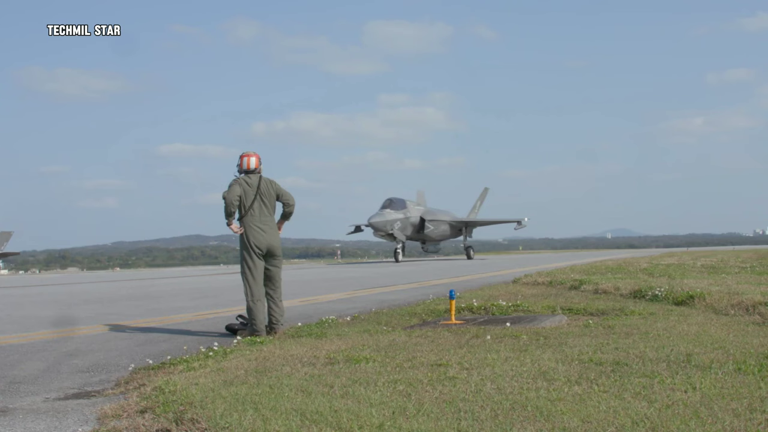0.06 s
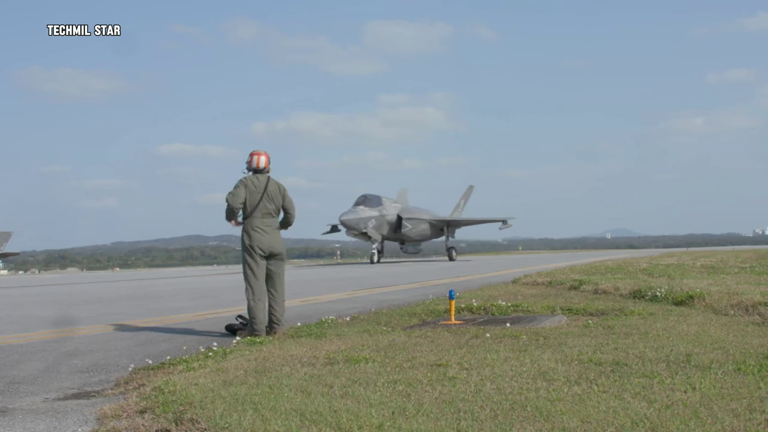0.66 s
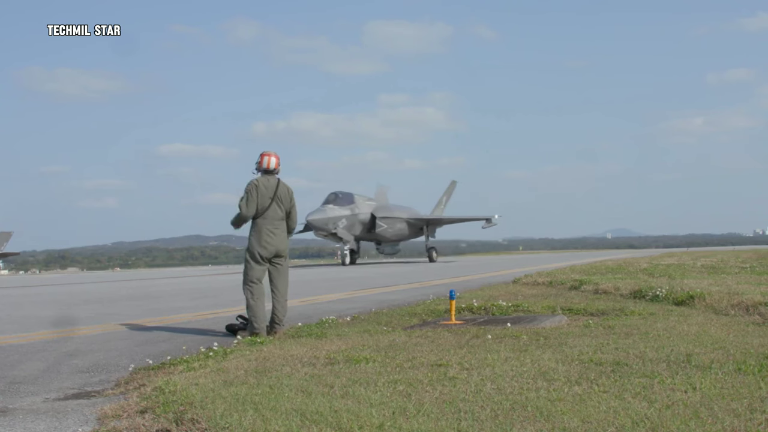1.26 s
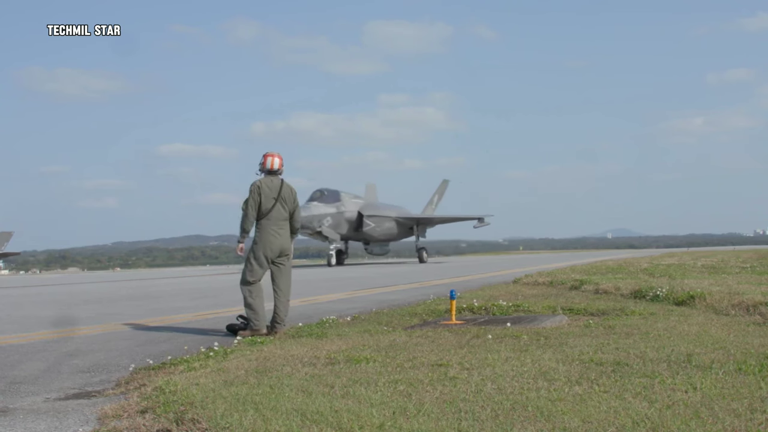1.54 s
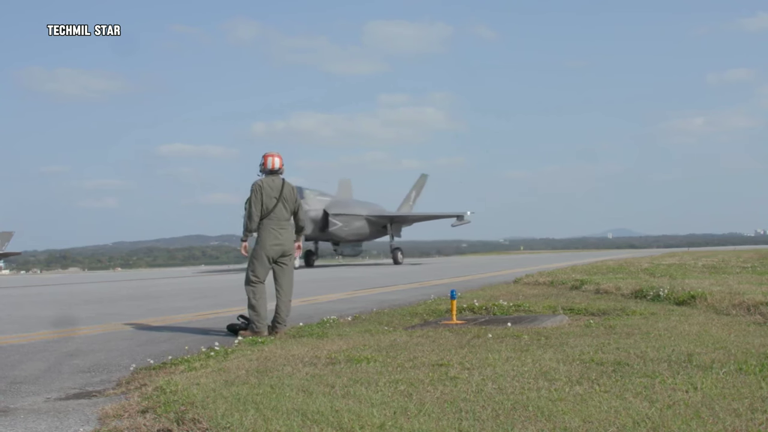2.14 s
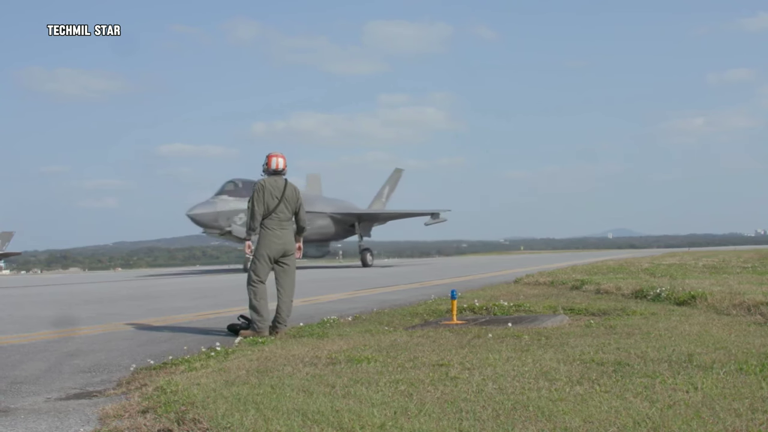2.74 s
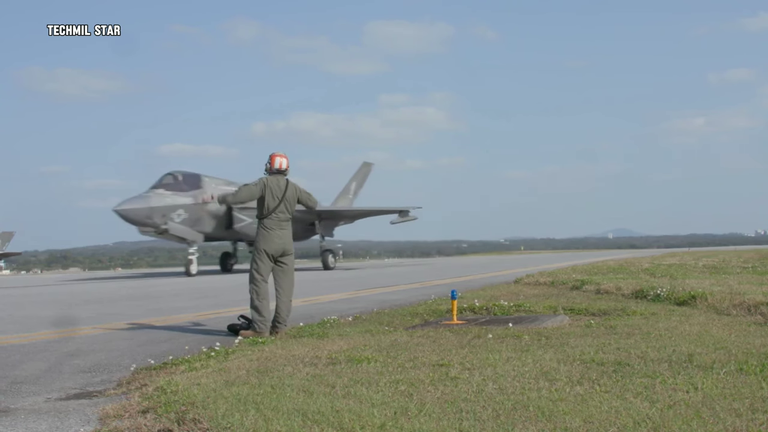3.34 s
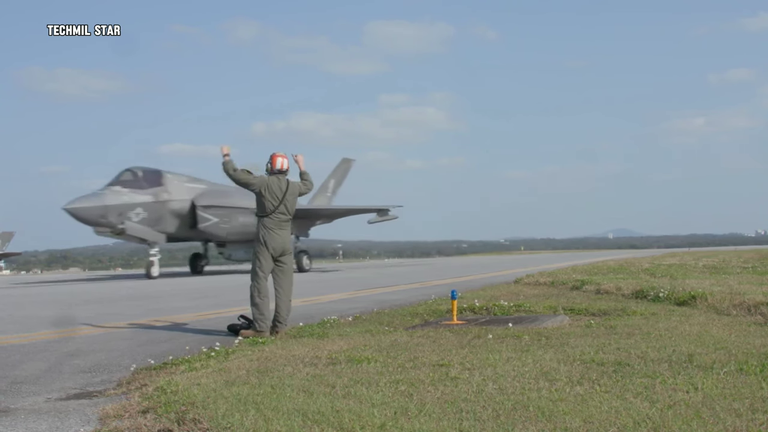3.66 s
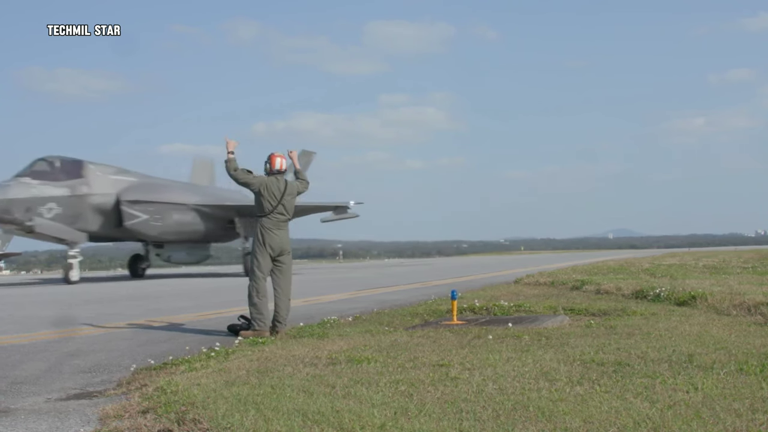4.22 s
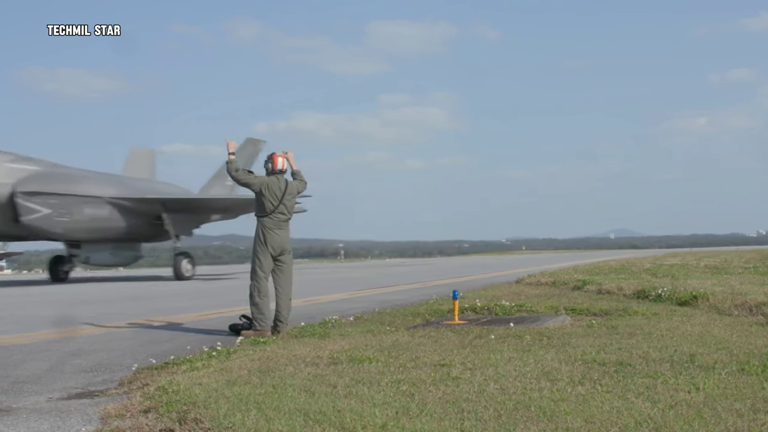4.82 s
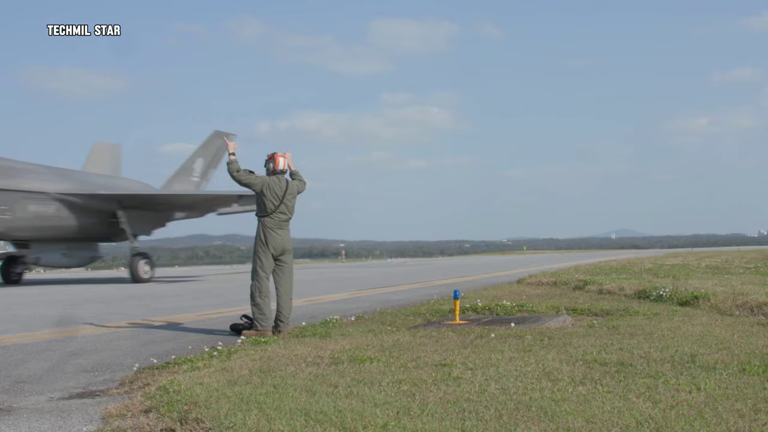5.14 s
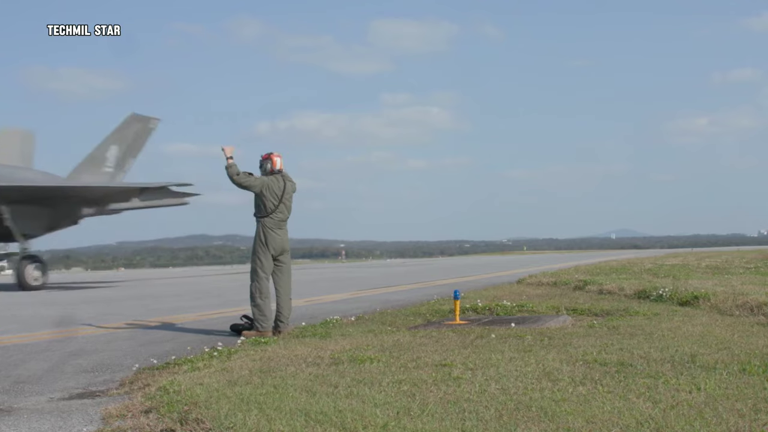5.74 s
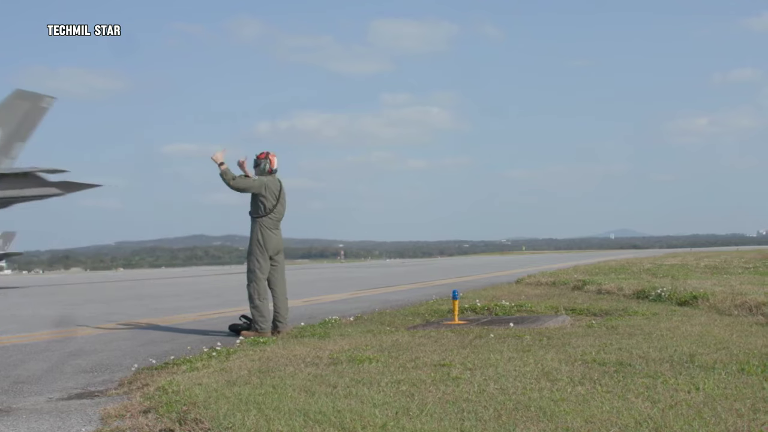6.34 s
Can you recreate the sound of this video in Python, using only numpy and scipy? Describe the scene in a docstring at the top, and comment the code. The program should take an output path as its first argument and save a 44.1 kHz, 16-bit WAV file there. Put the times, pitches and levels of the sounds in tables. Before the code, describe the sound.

A fighter jet taxis past with a steady rushing hiss and a high whine that rises briefly, then slowly sinks.

```python
"""Open airfield: a fighter jet taxis past, throttle nudged up and eased back. One microphone, mono.
A puff of wind buffets the microphone. The exhaust roars beneath and howls as the tail swings into view.
The intake's rush and hiss swell and fade through the breeze; the compressor whistles at low speed.
On top the fan whines, inside bands of blade noise that follow its speed.
The ground's reflection cuts two sliding dips in the jet's spectrum."""
import sys
import numpy as np
from scipy import signal
from scipy.fft import rfft, irfft, next_fast_len
from scipy.io import wavfile

SR = 44100
rng = np.random.default_rng(int(sys.argv[2]) if len(sys.argv) > 2 else 0)


def generate_wav(signal):
    """Clip the signal to [-1, 1] and save it as 16-bit WAV at the path in sys.argv[1]."""
    frames = np.transpose(np.atleast_2d(signal))
    scaled = np.clip(frames, -1, 1) * 32767
    pcm = np.round(scaled).astype(np.int16)
    wavfile.write(sys.argv[1], SR, pcm)


N = 281517

# noise spectra: f/Hz, relative density/dB
WIND_SPECTRUM = [(20, -10), (55, -2), (100, 8), (150, -7)]
RUMBLE_SPECTRUM = [(25, -29), (50, -27), (80, -19.5), (105, -11), (135, -8), (175, -4), (220, 1.5),
                   (255, -2.5), (290, -6), (360, -6.5)]
ROAR_SPECTRUM = [(250, -15.5), (310, -10), (370, -3.5), (470, 2), (600, -0.5), (700, 0), (800, 1),
                 (900, 2.5), (1100, -5)]
NOZZLE_SPECTRUM = [(4800, -23), (5300, -4), (5800, 3.5), (6500, -11), (7400, 1), (8100, -12), (9000, -24),
                   (11000, -32)]
RUSH_SPECTRUM = [(700, -37), (900, -2), (1130, -5), (1350, 1.5), (1900, 0), (2400, 0), (2900, -1),
                 (3500, -5.5), (4200, -1), (4900, -5.5), (5400, -6), (6500, -7.5), (8000, -29)]
HISS_SPECTRUM = [(5000, -20), (5600, -14.5), (6100, -3), (6400, 0), (6700, 2), (7000, -4), (7400, -12.5),
                 (7900, -24), (9000, -38)]
SPRAY_SPECTRUM = [(5000, -20), (7000, 6.5), (8100, 1), (8800, 7), (9600, 1), (10800, -0.5), (12000, -4),
                  (13200, -12.5), (15000, -17)]
# engine speed as fan pitch: t/s, f/Hz
FAN_PITCH = [(0, 1374), (.25, 1391), (.6, 1500), (1.05, 1680), (1.3, 1743), (2, 1704), (3, 1631), (4, 1563),
             (5, 1507), (5.5, 1487), (6.38, 1443)]
# swells of intake rush and hiss, shared by other engine sounds: t/s, level/dB
RUSH_SWELLS = [(0.0, -30.5), (0.18, -30.5), (0.6, -24.5), (0.92, -30.5), (1.56, -25.5), (2.04, -29),
               (2.98, -27.5), (3.24, -31), (3.44, -29.5), (3.66, -25.5), (6.1, -29), (6.38, -28)]
HISS_SWELLS = [(0.0, -32.5), (0.16, -31.5), (0.28, -33.5), (0.68, -23.5), (0.8, -30), (1.18, -29),
               (1.42, -22.5), (1.52, -29), (1.72, -24), (2.08, -30.5), (2.16, -25), (2.42, -30.5),
               (2.82, -25.5), (3.02, -32.5), (3.34, -27.8), (3.5, -30.5), (3.66, -25.5), (4.94, -29),
               (5.7, -29), (6.38, -35)]
# envelopes of compressor rasp, fan wash and fan tone: t/s, level/dB
RASP_ENVELOPE = [(0, -41), (.69, -23.5), (1, -34), (1.4, -29), (1.8, -39), (2.25, -30.5), (2.85, -27.5),
                 (3.15, -38), (3.35, -26), (3.75, -29.5), (5.3, -31), (6.38, -29)]
WASH_ENVELOPE = [(0, -33.5), (2, -34), (2.4, -27), (3.3, -31.5), (3.75, -40), (4.1, -31.5), (4.6, -38),
                 (5.6, -31), (6.38, -38.5)]
WHINE_ENVELOPE = [(0, -46), (0.16, -51), (0.34, -30), (0.66, -36), (0.84, -27.5), (1.15, -35.5),
                  (1.35, -32), (2.12, -35.5), (2.26, -26.5), (2.88, -30.5), (3.02, -42), (3.28, -32.5),
                  (3.66, -46), (3.88, -33.5), (4.34, -40.5), (4.56, -27), (5.08, -34.5), (5.26, -25.5),
                  (5.68, -27.5), (5.84, -35.5), (6.38, -31)]
# ground-reflection dips: t/s, centre f/Hz, share cancelled/0-1
LOW_DIP = [(0, 588, 1), (1.6, 604, 0.67), (4, 556, 0.04), (6.38, 600, 0.05)]
HIGH_DIP = [(0, 5800, 0.12), (2, 5580, 0.55), (3.7, 5500, .7), (4.4, 5262, .74), (5.2, 5060, 0.62),
            (6.38, 4850, 0.16)]

# level laws: base/dB, swell scale, abeam/dB, astern/dB, speed/(dB per doubling)
RUMBLE_LAW = (-46.5, 0.4, -2.5, -1, 8)
ROAR_LAW = (-34.5, 0.14, -0.5, -2.5, -0.5)
RUSH_LAW = (-26.5, 0.9, 1.75, -1, -0.5)
SPRAY_LAW = (-49, 1.02, 2, 4, -6)
WHISTLE_LAW = (-30.5, 0.23, 1.5, -2, -2)
OCTAVE_LAW = (-39.5, 2.0, -6, 5, 22)

ABEAM_S, PASS_S = 4.87, 1  # PASS_S: closest distance / rolling speed
TAXI_HZ = 1550  # fan pitch at ordinary taxiing speed
TIME_S = np.arange(N) / SR


def from_db(db):
    """Decibels to gain."""
    return 10 ** (np.asarray(db) / 20)


def unit_rms(x):
    """Scale to rms 1."""
    return x / np.sqrt(np.mean(np.abs(x) ** 2))


def curves(table):
    """Each column after t/s, interpolated to every sample."""
    times_s, *columns = np.transpose(table)
    return [np.interp(TIME_S, times_s, column) for column in columns]


def phase_of(hz):
    """Running phase of a gliding pitch."""
    return 2 * np.pi * np.cumsum(hz) / SR


def noise(spectrum):
    """Coloured noise, falling 60 dB/octave beyond the table's ends; rms 1."""
    size = next_fast_len(N)
    hz = np.maximum(np.fft.rfftfreq(size, 1 / SR), 1)
    points_hz, points_db = np.transpose(spectrum)
    octaves_outside = np.abs(np.log2(hz / np.clip(hz, points_hz[0], points_hz[-1])))
    gain = from_db(np.interp(np.log(hz), np.log(points_hz), points_db) - 60 * octaves_outside)
    return unit_rms(irfft(rfft(rng.standard_normal(size)) * gain, size)[:N])


def wander(rate_hz):
    """Complex noise low-passed at rate_hz; rms 1."""
    step, run_in = 10, 5000
    white = rng.standard_normal((2, N // step + run_in + 2))
    lowpass = signal.butter(2, rate_hz, fs=SR / step, output="sos")
    real, imag = signal.sosfilt(lowpass, white)[:, run_in:]
    return unit_rms(np.interp(np.arange(N) / step, np.arange(len(real)), real + 1j * imag))


def shimmer(depth_db, rate_hz):
    """Gain of a path through hot, moving air."""
    return from_db(depth_db * unit_rms(wander(rate_hz).real))


def sweep_gain(centre_s, half_width_s, peak_db, base_db):
    """Gain of a beam or puff crossing the microphone once: a bell on a low base."""
    bell = np.exp(-((TIME_S - centre_s) / half_width_s) ** 2)
    return from_db(base_db) + bell * (from_db(peak_db) - from_db(base_db))


def engine_gain(law, swells):
    """Gain of one engine sound from shared swells, the jet's bearing and engine speed."""
    base_db, swell_scale, abeam_db, astern_db, doubling_db = law
    swell_db, = curves(swells)
    bearing_rad = np.arctan((TIME_S - ABEAM_S) / PASS_S)
    aspect_db = abeam_db * np.cos(bearing_rad) ** 2 + astern_db * (1 + np.sin(bearing_rad)) / 2
    speed_db = doubling_db * np.log2(curves(FAN_PITCH)[0] / TAXI_HZ)
    return from_db(base_db + swell_scale * (swell_db - swell_db.mean()) + aspect_db + speed_db)


def envelope_gain(envelope, trim_db):
    """Gain from a level table plus a trim."""
    return from_db(curves(envelope)[0] + trim_db)


def blade_noise(phase, width_hz):
    """Turbulence smears a blade tone into a band that glides with the engine; rms 1."""
    return unit_rms((wander(width_hz / 2) * np.exp(1j * phase)).real)


def ground_dip(x, dip, width_hz):
    """The ground's reflection cancels part of a band that slides as the jet moves."""
    centre_hz, share = curves(dip)
    carrier = np.exp(1j * phase_of(centre_hz))
    baseband = signal.lfilter(*signal.butter(1, width_hz / 2, fs=SR), x / carrier)
    return x - share * 2 * (baseband * carrier).real


def wind():
    """Light breeze on the microphone, with one puff as the jet arrives."""
    return sweep_gain(centre_s=3.93, half_width_s=0.13, peak_db=-55, base_db=-67) * noise(WIND_SPECTRUM)


def exhaust(fan_phase):
    """Roar and rumble throughout; beamed howl and hiss as the nozzle turns to the microphone."""
    roar = engine_gain(ROAR_LAW, RUSH_SWELLS) * noise(ROAR_SPECTRUM)
    rumble = engine_gain(RUMBLE_LAW, RUSH_SWELLS) * noise(RUMBLE_SPECTRUM)
    howl_beam = sweep_gain(centre_s=5.5, half_width_s=1.33, peak_db=-31.5, base_db=-51)
    hiss_beam = sweep_gain(centre_s=6, half_width_s=1.4, peak_db=-34.5, base_db=-57)
    howl = howl_beam * blade_noise(0.515 * fan_phase, width_hz=190)
    return roar + rumble + howl + hiss_beam * noise(NOZZLE_SPECTRUM)


def intake():
    """Air drawn into the engine: broad rush, shrill hiss, fine treble spray."""
    rush = engine_gain(RUSH_LAW, RUSH_SWELLS) * noise(RUSH_SPECTRUM)
    hiss = envelope_gain(HISS_SWELLS, trim_db=0.02) * noise(HISS_SPECTRUM)
    hiss *= shimmer(depth_db=0.5, rate_hz=21)
    spray = engine_gain(SPRAY_LAW, HISS_SWELLS) * noise(SPRAY_SPECTRUM)
    return rush + hiss + spray


def compressor(fan_hz, ratio=2.895, knee_hz=1560, stop_hz=1594, fade_hz=18):
    """The inner spool follows the fan, lagging above a knee: broad rasp, breathy whistle at low speed."""
    lag_hz = np.maximum(fan_hz - knee_hz, 0)
    phase = phase_of(ratio * fan_hz - lag_hz)
    low_speed_gate = (1 - np.tanh((fan_hz - stop_hz) / fade_hz / 2)) / 2
    whistle_gain = low_speed_gate * engine_gain(WHISTLE_LAW, HISS_SWELLS) * from_db(0.5)
    whistle = whistle_gain * blade_noise(phase, width_hz=220)
    rasp = envelope_gain(RASP_ENVELOPE, trim_db=-4) * blade_noise(0.99 * phase, width_hz=920)
    return whistle + rasp


def fan(phase, scatter=0.33):
    """Blade tone, fluttered by its scattered part; noise bands round it and near its octave."""
    flutter = 1 + scatter * wander(rate_hz=22)
    tone = envelope_gain(WHINE_ENVELOPE, trim_db=0.5) * unit_rms((flutter * np.exp(1j * phase)).real)
    skirt = envelope_gain(WHINE_ENVELOPE, trim_db=-8) * blade_noise(phase, width_hz=160)
    wash = envelope_gain(WASH_ENVELOPE, trim_db=0.86) * blade_noise(0.94 * phase, width_hz=590)
    octave = engine_gain(OCTAVE_LAW, RUSH_SWELLS) * blade_noise(1.95 * phase, width_hz=270)
    return tone + skirt + wash + octave


def scene():
    """Engine sound crosses hot air and tarmac to a microphone in a light breeze."""
    fan_hz, = curves(FAN_PITCH)
    fan_phase = phase_of(fan_hz)
    inlet = compressor(fan_hz) + intake()
    jet = fan(fan_phase) + inlet * shimmer(depth_db=0.53, rate_hz=12) + exhaust(fan_phase)
    jet = ground_dip(jet, LOW_DIP, width_hz=165)
    jet = ground_dip(jet, HIGH_DIP, width_hz=750)
    mono = jet + wind()
    return np.stack([mono, mono])


def record(dry, cutoff_hz=14960):
    """Steep low-pass."""
    return signal.sosfilt(signal.ellip(12, 0.1, 90, cutoff_hz, fs=SR, output="sos"), dry)


dry = scene()
out = record(dry)
generate_wav(out)
```